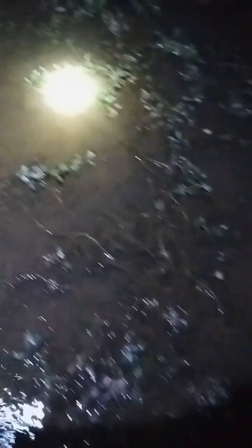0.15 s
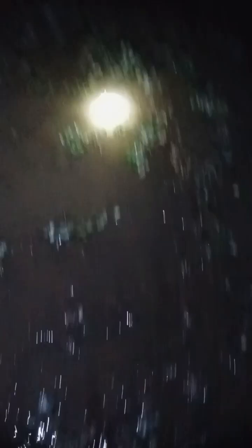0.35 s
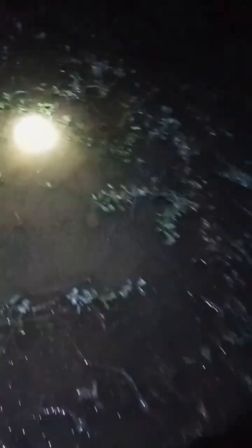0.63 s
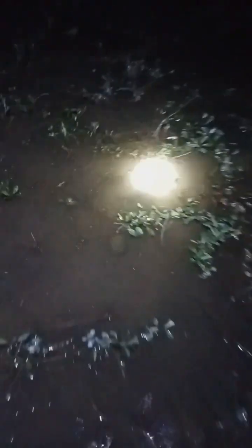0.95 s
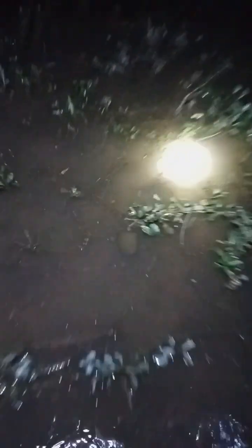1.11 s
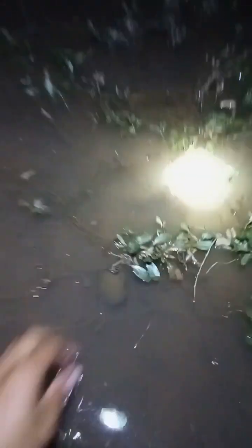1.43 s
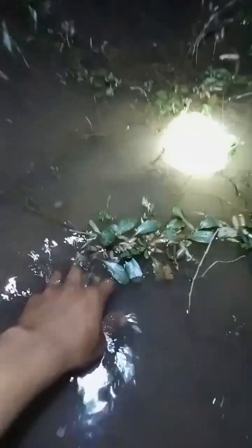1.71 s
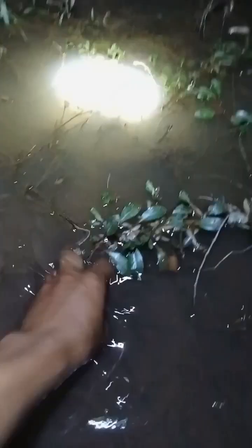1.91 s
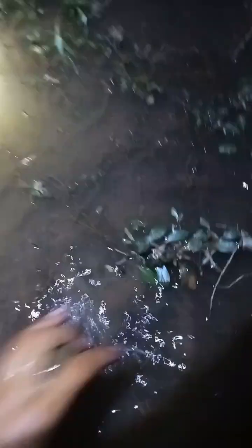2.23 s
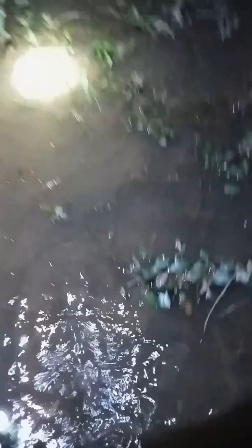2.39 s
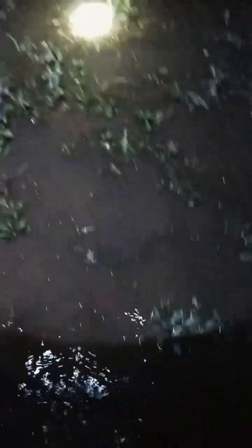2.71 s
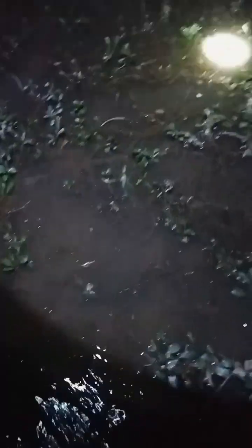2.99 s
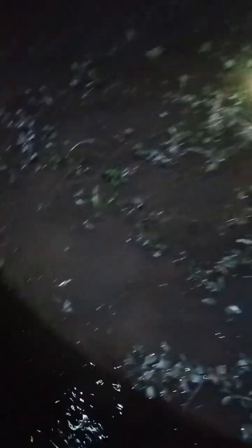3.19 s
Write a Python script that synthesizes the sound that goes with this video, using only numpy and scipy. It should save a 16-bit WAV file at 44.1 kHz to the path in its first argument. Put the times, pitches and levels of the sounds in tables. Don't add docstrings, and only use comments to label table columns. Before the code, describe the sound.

Water splashes and fizzes with bubbles and spray after a short hollow knock; drops drip, then a much louder clattering knock on wood. Quiet outdoor night, very faint insects, close handheld microphone.

```python
import sys
import numpy as np
from scipy import signal
from scipy.fft import rfft, irfft
from scipy.io import wavfile
from scipy.ndimage import uniform_filter1d

SR = 44100
rng = np.random.default_rng(int(sys.argv[2]) if len(sys.argv) > 2 else 0)


def bounce(signal):
    frames = np.transpose(np.atleast_2d(signal))
    limited = np.clip(frames, -1, 1)
    pcm = np.round(limited * 32767).astype(np.int16)
    wavfile.write(sys.argv[1], SR, pcm)


def ratio(d):
    e = np.asarray(d, float) / 20
    return 10 ** e


N = 147735


def evened(x):
    return x / np.sqrt(np.mean(x ** 2) + 1e-20)


def read(points, hz):
    point_hz, value = np.transpose(points)
    return np.interp(np.log(hz + 1), np.log(point_hz + 1), value)


def add(mix, s, sound):
    part = mix[round(s * SR):][:len(sound)]
    part += sound[:len(part)]


def colour(x, points, tilt_db=0):
    hz = np.fft.rfftfreq(len(x), 1 / SR)
    gain = ratio(read(points, hz) + tilt_db * np.log2((hz + 600) / 1000))
    gain = gain / np.sqrt(np.mean(gain ** 2))
    return irfft(rfft(x) * gain, len(x))


def resonate(x, hz, width):
    turn = np.exp(2j * np.pi * np.cumsum(hz * np.ones(len(x))) / SR)
    r = np.exp(-np.pi * width / SR)
    smooth = signal.lfilter([1 - r], [1, -r], x / turn + 1e-18)
    return 2 * (turn * smooth).real


def slow(per_s):
    size = int(SR / per_s)
    wander = uniform_filter1d(rng.standard_normal(N), size)
    return evened(uniform_filter1d(wander, size))


def bubble(db, hz, ring, rise):
    ring = max(ring, .0005)
    t = np.arange(0, 2.2 * ring, 1 / SR)
    attack = np.sin(np.pi / 2 * np.minimum(t * hz / 2.13, 1)) ** 2
    end = 1 - (t / t[-1]) ** 4
    tone = np.sin(2 * np.pi * hz * t * (1 + rise * t / ring / 2))
    return ratio(db - 10 * t / ring) * attack * end * tone


def puff(db, hz, ring, share):
    t = np.arange(900) / SR
    noise = resonate(resonate(rng.standard_normal(900), hz, share * hz), hz, 2 * share * hz)
    return ratio(db - 10 * t / ring) * np.minimum(t / ring / 0.17, 1) * evened(noise)


def fizz():
    # time in seconds, level in dB, brightness in dB per octave.
    stirring = [(.33, -59, -6.5), (.42, -48.5, -2), (0.471, -41, -2), (0.514, -39, -2), (.54, -42, -0.5),
                (.585, -41, 0.5), (0.612, -46.5, 2), (0.662, -37.5, 1.5), (0.721, -53.5, 1.5),
                (0.754, -41, 3), (0.783, -45, 2), (0.805, -35, 3.2), (0.836, -41.5, 1), (.97, -44, 2.5),
                (1.09, -48.5, -1.5), (1.156, -45.5, 5.5), (1.22, -56, 0.5), (1.7, -64.5, 4)]
    # frequency in Hz, level in dB per Hz.
    fizz_spectrum = [(150, -13), (300, -7.5), (1390, 0), (2600, -5), (3500, -5.5), (5500, -11.5),
                     (10500, -25.5), (15500, -30)]
    grains_per_s, grain_spread_db, grain_cycles = 6000, 3.5, 6.4
    grain_db, hiss_db = -4.5, -4.5

    pitches = np.geomspace(250, 14000, 36)
    hits = rng.random(N) < grains_per_s / SR
    size = ratio(grain_spread_db * np.minimum(rng.exponential(1, N), 5)) * hits
    which = rng.integers(0, len(pitches), N)
    grains = np.zeros(N)
    for k, hz in enumerate(pitches):
        db = read(fizz_spectrum, hz) + 6 * np.log2(hz / 1000)
        grain = bubble(db, hz, grain_cycles / hz, 0.053)
        grains += signal.oaconvolve(size * (which == k), grain)[:N]

    hiss = colour(rng.standard_normal(N), fizz_spectrum)
    flicker = ratio(3.77 * slow(203))
    foam = flicker * (ratio(grain_db) * evened(grains) + ratio(hiss_db) * hiss)

    at, level_db, bright = np.transpose(stirring)
    hz, frame_s, z = signal.stft(foam, SR, nperseg=256)
    octaves = np.log2((hz[:, None] + 200) / 3000)
    z = z * ratio(octaves * np.interp(frame_s, at, bright))
    tilted = signal.istft(z, SR, nperseg=256)[1][:N]

    times = np.r_[at[0] - .03, at, at[-1] + .9]
    levels = np.r_[-90, level_db, -78]
    return tilted * ratio(np.interp(np.arange(N) / SR, times, levels))


def large_bubbles():
    # start in seconds, level in dB, pitch in Hz.
    bubble_hits = [(0.335, -32, 950), (0.351, -32.5, 660), (0.387, -34.5, 1450), (0.402, -34, 640),
                   (0.441, -30.5, 690), (0.466, -22, 1696), (0.507, -25, 1810), (0.513, -25, 780.0),
                   (0.577, -28, 864), (0.647, -30.5, 1810.0), (0.732, -32, 755), (0.803, -29.5, 2090),
                   (0.832, -19.5, 257), (0.871, -27, 2090), (0.911, -28.5, 1380.0), (0.921, -31.5, 1420),
                   (0.977, -26.5, 1790), (0.983, -19.5, 298), (1.034, -33.5, 2000), (1.062, -35, 1500),
                   (0.457, -32.5, 1580), (.473, -25.5, 1920), (.514, -25.5, 2060), (0.508, -31, 335),
                   (.657, -36, 806), (0.744, -32, 1430), (.752, -34, 2020), (0.804, -31.5, 1250),
                   (.842, -32, 600), (.939, -33.5, 520), (0.956, -33, 1320), (0.962, -29.5, 413),
                   (1.118, -26.5, 306), (1.125, -34, 500), (1.142, -24, 340), (1.127, -37, 1380),
                   (1.186, -30, 324), (1.19, -36.5, 670), (1.318, -40.5, 1170), (1.375, -39, 2210),
                   (1.382, -38.5, 1550), (1.488, -40.5, 450), (1.49, -44, 1700)]
    out = np.zeros(N)
    for s, db, hz in bubble_hits:
        ring_s = 0.0035 * (1000 / hz) ** 0.26
        add(out, s, bubble(db + 4, hz, ring_s, 0.0057))
    return out


def spray():
    # start in seconds, level in dB, pitch in Hz.
    spray_bursts = [(0.371, -45, 3620), (0.474, -30.0, 3780), (0.503, -31, 4840), (0.559, -34.5, 2720),
                    (0.588, -47.5, 8180.0), (0.641, -37, 3180), (0.754, -32, 3480), (0.764, -31.5, 3430),
                    (0.807, -20.5, 3410), (0.858, -36.5, 3970), (0.917, -31, 3340), (0.967, -36.5, 8740),
                    (0.967, -25, 3410), (0.976, -26, 3470), (0.998, -32.5, 3420), (1.037, -43.5, 7960),
                    (1.105, -43.5, 7300), (1.298, -48, 7500), (0.483, -33, 3030), (.515, -31, 4100),
                    (.585, -40, 4000), (0.667, -44, 4200), (.745, -41, 3580), (.793, -29, 3200),
                    (.94, -38, 1970), (1.105, -47, 4190), (1.142, -39.5, 5800), (1.15, -48, 5560),
                    (1.154, -45, 4100), (1.187, -44, 5440), (1.263, -47.5, 3200), (1.428, -46.5, 4130),
                    (3.077, -50.5, 8500), (3.045, -51, 4120), (3.298, -52, 4210)]
    out = np.zeros(N)
    for s, db, hz in spray_bursts:
        add(out, s, puff(db + 4.5, hz, 0.0025, 0.1))
    return out


def drips():
    # start in seconds, level in dB, pitch in Hz, ring in seconds,
    # pitch rise as a share.
    falling_drops = [(0.144, -44, 4000, 0.0054, 0.024), (1.263, -39, 685, 0.0093, 0.034),
                     (1.348, -38.5, 1365, 0.017, 0.0089), (1.37, -30, 1490, 0.0022, 0.3),
                     (1.43, -42, 1154, 0.0093, 0.036), (1.516, -39.5, 1230, 0.006, 0.018),
                     (2.041, -43.5, 2150, 0.0042, .03), (2.1171, -22.5, 2280, 0.0012, 0.019),
                     (2.117, -32, 1964, 0.013, 0.15), (2.164, -38, 2145, 0.012, 0.031),
                     (2.166, -32.5, 2500, 0.0022, 0.036), (2.247, -47, 3780, 0.0051, .03),
                     (2.306, -45.5, 2390, .004, .3), (2.306, -41.5, 1354, 0.012, 0.02),
                     (2.336, -31.5, 2620, 0.0023, 0.039), (2.344, -41.5, 3970, 0.0032, 0.058)]
    out = np.zeros(N)
    for s, db, hz, ring_s, rise in falling_drops:
        add(out, s, bubble(db, hz, ring_s, rise))
    return out


def ticks():
    # start in
    # seconds, level in dB, pitch in Hz.
    film_bursts = [(0.178, -53.5, 7660), (.263, -32, 8900), (0.735, -28, 11800), (1.314, -39.5, 7440),
                   (1.371, -29, 5050), (1.43, -30, 7940), (1.922, -54, 8950), (2.518, -47, 9000),
                   (2.533, -42.5, 11900), (2.591, -38.5, 7400), (2.595, -41, 10920), (2.654, -45, 9400),
                   (2.812, -55, 9300), (2.975, -49, 8900)]
    tick_s, stray_per_s, stray_db = 0.00025, 110, -59.5
    foam_start_s, foam_life_s = 1.0, 1.6
    out = np.zeros(N)
    for s, db, hz in film_bursts:
        add(out, s, puff(db, hz, tick_s, 0.4))
    for age, extra_db, extra_hz in rng.random((int(stray_per_s * N / SR), 3)) * [1, 12, 6000]:
        s = foam_start_s + foam_life_s * age ** 2
        add(out, s, puff(stray_db + extra_db - 8 * age, 9500 + extra_hz, tick_s, 0.4))
    return out


def pockets():
    # start in seconds, level in dB, pitch in Hz, ring in seconds.
    air_pockets = [(.2615, -5.5, 820, 0.0032), (.2775, -14.5, 785, 0.0038), (0.2909, -14, 980, 0.0026),
                   (.2905, -22, 2310, 0.0038), (.295, -22, 808, 0.011), (2.8682, -1.5, 1106, .003),
                   (2.8661, -8.5, 1667, 0.0053), (2.8679, -14, 4006, 0.0049), (2.872, -15, 590, 0.004),
                   (2.868, -13, 307, .01), (2.8873, -8, 1310, 0.0022), (2.894, -11, 1100, 0.0025),
                   (2.8992, -10, 1430, 0.0021), (2.9154, -16, 1113, 0.0038), (2.914, -32, 3670, .002),
                   (2.923, -16, 1080, 0.0033), (3.0075, -18, 1910, 0.0028), (3.0077, -26, 3460, 0.0033),
                   (3.015, -15, 2000, 0.0025), (3.017, -11, 990, 0.0025), (3.021, -16, 697, 0.0041),
                   (3.032, -25, 1380, 0.0032)]
    out = np.zeros(N)
    for s, db, hz, ring_s in air_pockets:
        add(out, s, bubble(db, hz, ring_s, 0.023))
    return out


def knocks():
    # start in seconds, level in dB, contact in seconds,
    # hardness in dB per octave.
    plank_blows = [(.125, -45.5, 0.0052, 2), (.26, -17.5, 0.007, -2), (.278, -26.5, 0.0046, -10),
                   (.289, -25, 0.0051, -7), (2.865, -7.5, 0.0063, -2.5), (2.882, -18, 0.0047, -11),
                   (2.896, -28, 0.012, -14), (2.915, -24, 0.0071, -6), (2.905, -26.5, 0.008, -6),
                   (2.936, -28, 0.0084, -9), (2.949, -35.5, 0.007, -7), (3.007, -21, 0.0039, -8),
                   (3.012, -20.5, 0.0099, -8), (3.032, -41, 0.011, -27), (3.153, -37, 0.0037, -4.5)]
    # frequency in Hz, level in dB per Hz.
    crack_spectrum = [(47, -95.5), (80, -26), (751, -7.5), (1700, -4), (2900, -17.5), (4140, -13),
                      (5280, -24), (11000, -41), (16000, -58.5)]
    # pitch in Hz, level in dB, time to fall 60 dB in seconds.
    plank_modes = [(130, -10, 0.055), (220, 1.5, 0.23), (218, -11, 0.15), (284, -9.5, 0.062),
                   (646, -14, 0.12), (780, -14, 0.056), (1015, -10, 0.041), (1100, -15, 0.064),
                   (1384, -8, 0.057)]
    rattle_db, rattle_t60_s = -9.5, 0.13
    ring_db, boom_db = -40, -14.5
    rest_s, rest_width_s, rest_db = 2.98, 0.021, -21

    force, push = pockets(), np.zeros(N)
    t = np.arange(8192) / SR
    for s, db, contact_s, hard_db in plank_blows:
        u = t / contact_s
        shape = np.sin(np.pi * u.clip(0, 1) ** 0.76) ** 2
        noise = rng.standard_normal(8192)
        crack = colour(noise, crack_spectrum, hard_db) * shape
        fade = ratio(rattle_db - 60 * t / rattle_t60_s) * u.clip(0, 1)
        rattle = fade * colour(noise, crack_spectrum, hard_db - 2.0)
        add(force, s, ratio(db) * (crack + rattle))
        add(push, s, ratio(db - 0.83 * hard_db) * shape)
    high_pass = signal.butter(2, 110, "high", fs=SR, output="sos")
    force, push = signal.sosfilt(high_pass, [force, push])

    modes = [ratio(db - 60 * t / t60_s) * np.sin(2 * np.pi * hz * t) for hz, db, t60_s in plank_modes]
    boom = signal.oaconvolve(np.gradient(push), sum(modes[:4]))[:N]
    ring = signal.oaconvolve(force, sum(modes[4:]))[:N]
    rest = np.exp(-((np.arange(N) / SR - rest_s) / rest_width_s) ** 2)
    boom_gain = ratio(boom_db + 1.9 * slow(79) + rest_db * rest)
    return force + ratio(ring_db) * ring + boom_gain * boom


def scrapes():
    # start in seconds, length in seconds, level in dB, start pitch in Hz, # end
    # pitch in Hz.
    slides = [
        (1.105, .105, -43, 290, 420),
        (1.122, 0.085, -50, 5600, 5500),
        (3.06, 0.028, -36, 1880, 6100),
        (3.17, .1, -50, 1000, 1040),
        (3.17, 0.1, -62, 5200, 4100),
        (2.864, .012, -33, 9400, 7000),
        (1.1, 0.12, -49, 1300, 1800),
        (1.3, 0.062, -54, 980, 1230),
    ]
    out = np.zeros(N)
    for s, length_s, db, start_hz, end_hz in slides:
        u = np.linspace(0, 1, int(length_s * SR))
        hz = start_hz * (end_hz / start_hz) ** u
        grit = rng.laplace(size=len(u))
        for _ in range(4):
            grit = resonate(grit, hz, 0.99 * np.sqrt(start_hz * end_hz))
        add(out, s, ratio(db) * np.sin(np.pi * u) ** 2 * evened(grit))
    return out


def insects():
    # start in seconds, end in seconds, pitch in Hz, width in Hz, level in dB.
    songs = [
        (1.61, 1.82, 6190, 200, -69),
        (0, 3.35, 2510, 70, -75),
    ]
    t = np.arange(N) / SR
    out = np.zeros(N)
    for start, end, hz, width, db in songs:
        song = resonate(resonate(rng.standard_normal(N), hz, width), hz, width)
        fade = np.clip(np.minimum(t - start, end - t) / 0.044 + 0.22, 0, 1)
        out += ratio(db + slow(40)) * evened(song) * fade
    return out


def rumble():
    hz, width_hz, level_db, gust_db = 76, 50, -63, 2
    surge_db, surge_s = 5, 1.35
    low = resonate(resonate(rng.standard_normal(N), hz, width_hz), hz, 2 * width_hz)
    surge = np.exp(-((np.arange(N) / SR - surge_s) / 1.0) ** 2)
    return ratio(level_db + gust_db * slow(8.1) + surge_db * surge) * evened(low)


def night_air():
    # frequency in Hz, level in dB per Hz.
    air_spectrum = [(15, -41.5), (25, -31), (76, 3), (962, -17), (2410, -18), (4030, -21.5), (8830, -34),
                    (16000, -54.5)]
    return ratio(-59 + 0.39 * slow(3.5)) * colour(rng.standard_normal(N), air_spectrum)


def scene():
    water = fizz() + large_bubbles() + spray() + drips() + ticks()
    wood = knocks() + scrapes()
    background = insects() + rumble() + night_air()
    return (water + wood + background)[None]


def band_limit(x):
    return signal.sosfilt(signal.butter(12, 16660, fs=SR, output="sos"), x)


def record(dry):
    # pitch in Hz, width in Hz, level in dB.
    port_peaks = [(4000, 280, -9), (8420, 970, 2.5)]
    ported = dry[0].copy()
    for hz, width, db in port_peaks:
        ported += ratio(db) * resonate(dry[0], hz, width)
    wind_cut = signal.butter(3, 41, "high", fs=SR, output="sos")
    clipped = np.clip(signal.sosfilt(wind_cut, ported), -1, 1)
    treble_cut = signal.firwin(201, 16100, fs=SR)
    finished = signal.oaconvolve(clipped[None], treble_cut[None], "same")
    return band_limit(finished)


dry = scene()
out = record(dry)
bounce(out)
```